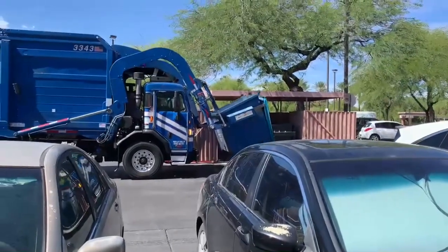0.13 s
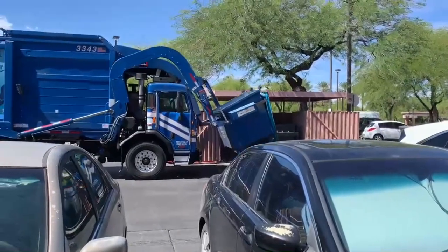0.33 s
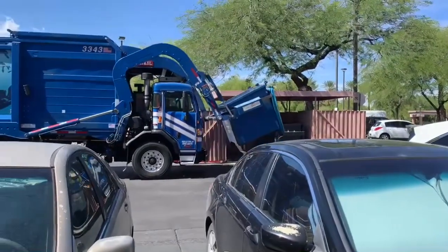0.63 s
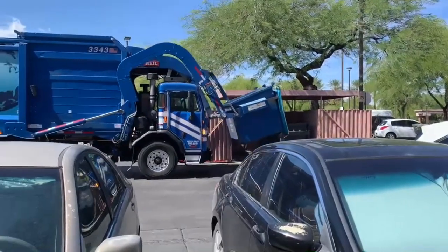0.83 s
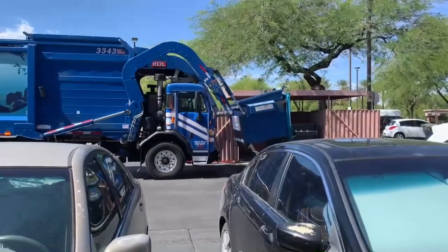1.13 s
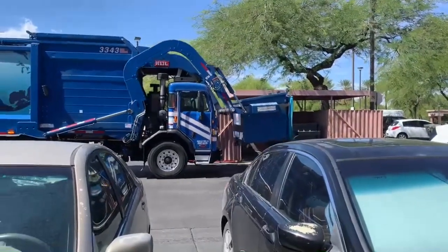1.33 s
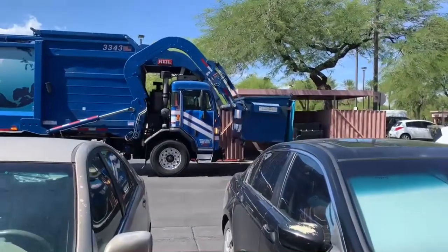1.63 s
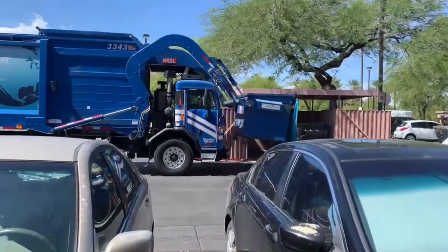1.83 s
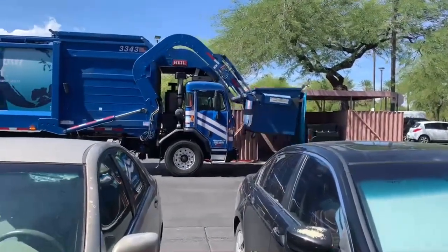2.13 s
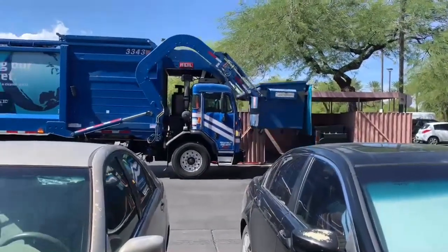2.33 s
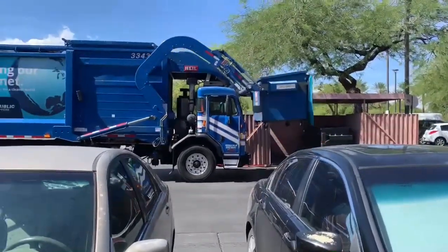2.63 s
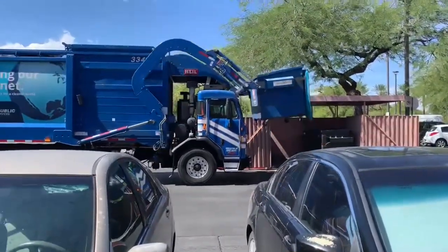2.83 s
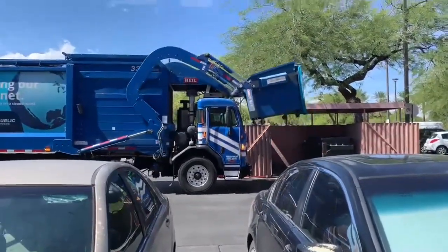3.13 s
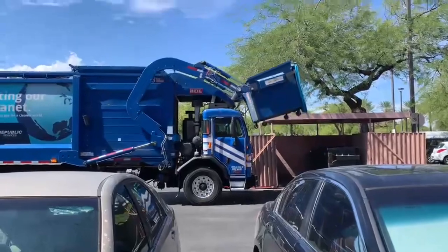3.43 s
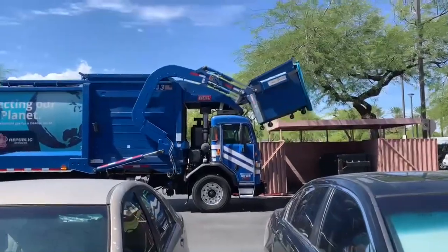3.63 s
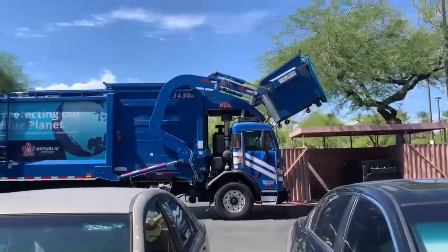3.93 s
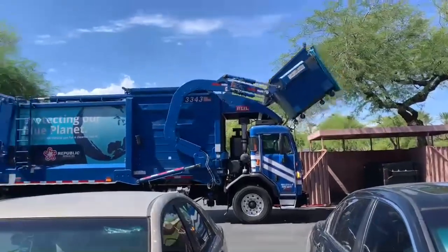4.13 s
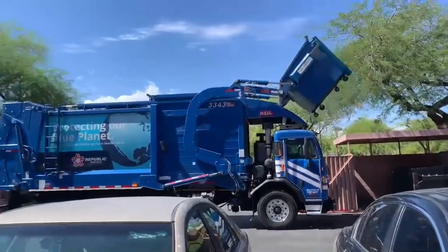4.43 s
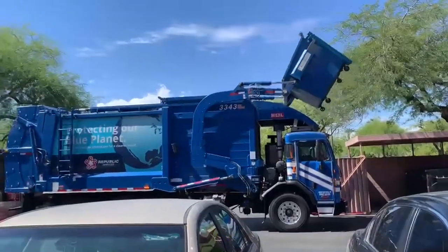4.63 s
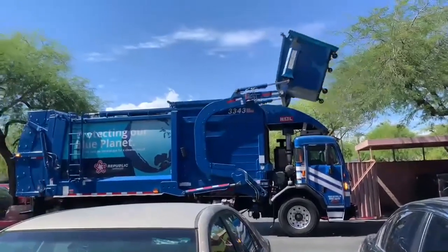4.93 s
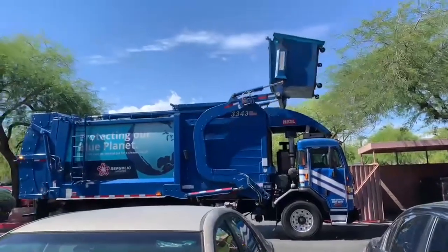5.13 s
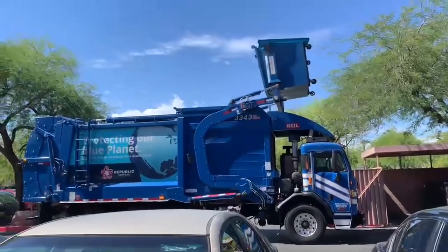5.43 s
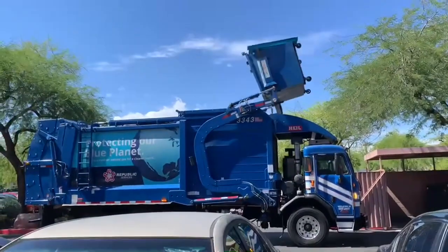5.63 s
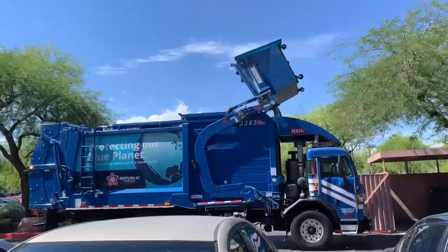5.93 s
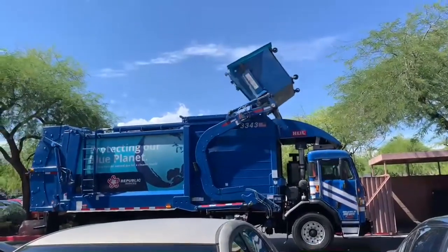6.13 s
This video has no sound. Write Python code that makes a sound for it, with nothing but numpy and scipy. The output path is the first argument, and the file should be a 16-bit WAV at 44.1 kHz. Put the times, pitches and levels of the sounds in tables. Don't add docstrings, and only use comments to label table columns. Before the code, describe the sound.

Outdoors in a car park, a heavy refuse truck engine roars some distance from a handheld phone. Breathy exhaust, rattling panels and rushing air surround a wavering fan drone and thin pump whine. Effort peaks midway, sags, then climbs again. Steel ticks and low shudders appear now and then, with light wind rumble, until the container lid bangs open at the very end.

```python
import sys
import numpy as np
from scipy import signal
from scipy.io import wavfile
from scipy.ndimage import uniform_filter1d

SR = 44100
rng = np.random.default_rng(int(sys.argv[2]) if len(sys.argv) > 2 else 0)


def generate_wav(sig):
    pcm = np.round(np.clip(np.atleast_2d(sig).T, -1, 1) * 32767).astype(np.int16)
    wavfile.write(sys.argv[1], SR, pcm)


def gain_from_db(level_db):
    decades = np.asarray(level_db, float) / 20
    return 10 ** decades


N = 277124
T = np.arange(N) / SR
HZ = np.fft.rfftfreq(2048, 1 / SR)
FRAMES = np.arange(N // 512 + 5) * 512 / SR


def evened(x):
    return x / np.sqrt(np.mean(x ** 2) + 1e-20)


def columns(rows, at):
    first, *rest = np.transpose(rows)
    return [np.interp(at, first, c) for c in rest]


def colour(points):
    hz, db = np.transpose(points)
    gain = gain_from_db(np.interp(np.log(HZ + 1), np.log(hz + 1), db, left=-90, right=-90))
    return evened(gain)[:, None]


def drift(rate_hz, at):
    rates = np.geomspace(.1, 1, num=24) * rate_hz
    return evened(sum(np.sin(2 * np.pi * (f * at + rng.random())) / np.sqrt(f) for f in rates))


def resonate(x, hz, width):
    turn = np.exp(2j * np.pi * np.cumsum(hz * np.ones(x.shape[-1])) / SR)
    r = np.exp(-np.pi * width / SR)
    return 2 * (turn * signal.lfilter([1 - r], [1, -r], x / turn)).real


def band(x, low_hz, high_hz):
    return signal.sosfilt(signal.butter(2, [low_hz, high_hz], "band", fs=SR, output="sos"), x)


def swells(start, length, db, rise_s, fall_s, rest_db, at):
    before = np.maximum(start - at[:, None], 0) / rise_s
    after = np.maximum(at[:, None] - start - length, 0) / fall_s
    power = gain_from_db(2 * db) * np.exp(-2 * (before ** 2 + after ** 2))
    return np.interp(T, at, 10 * np.log10(gain_from_db(2 * rest_db) + power.sum(axis=1)))


# pitch_hz, likeness_0_to_1, phase_lead_turns, left_minus_right_db
PORTS = [(30, 0.7, 0.16, -4), (70, 0.96, -0.041, -4), (150, 0.88, -0.011, 0), (317, 0.83, 0.046, -1.3),
         (613, 0.6, -0.034, 2), (1000, 0.64, -0.088, 0), (1800, 0.6, 0.016, 2), (2570, 0.4, -0.024, -.5),
         (4220, 0.6, -0.0035, -2), (5620, 1, 0.33, -2.5), (5870, 0.3, 0.46, -6.5), (6360, 0.9, -0.01, 2.5),
         (7000, 0.74, -0.21, -2), (8100, 0.95, -0.448, 2), (10750, 1, -0.89, -1), (13400, 0.92, -1.53, 0),
         (15700, .95, -1.87, 2)]
# time_s, left_port_lag_samples
PHONE_TURN = [(0, -4.8), (1.4, -3.7), (3.0, -2.5), (3.7, -.8), (4.3, 1.1), (5.0, 2.2), (5.8, 2.2),
              (6.28, 1.3)]


def port_noise(gain):
    a, b, c, d = rng.standard_normal((len(FRAMES), len(HZ), 4)).T
    same, turns, pan_db = (v[:, None] for v in columns(PORTS, HZ))
    delayed_hz = (HZ * np.exp(-(HZ / 4700) ** 8))[:, None]
    turns = turns - delayed_hz * columns(PHONE_TURN, FRAMES)[0] / SR
    same = np.clip(same, 0, 1)
    left = a + 1j * b
    right = same * left * np.exp(-2j * np.pi * turns) + np.sqrt(1 - same ** 2) * (c + 1j * d)
    z = np.array([left * gain_from_db(pan_db / 2), right * gain_from_db(-pan_db / 2)]) * gain
    return signal.istft(z, nperseg=2048, noverlap=1536)[1][:, :N] / 38.46


# pitch_hz, level_db
RUMBLE = [(20, -45), (38, -18), (48, 3), (62, 2), (85, 11.5), (100, 16), (120, 1), (142, -29), (165, 0),
          (210, -32)]
# start_s, length_s, level_db
GUSTS = [(0.293, 0.077, -28.5), (0.733, 0.066, -20.5), (.88, 0.11, -24), (1.49, .08, -26),
         (2.206, 0.08, -26), (3.047, 0.052, -29), (2.873, 0.044, -29), (3.65, .08, -37),
         (4.103, 0.086, -22), (4.45, 0.037, -22), (4.837, 0.052, -36), (5.385, .03, -32), (6.2, .1, -24)]


def wind_rumble():
    gust_db = swells(*np.transpose(GUSTS), rise_s=0.066, fall_s=0.21, rest_db=-29.5, at=FRAMES)
    level_db = np.interp(FRAMES, T, gust_db) + drift(7.7, FRAMES)
    return colour(RUMBLE) ** 2 * gain_from_db(2 * level_db)


# time_s, fan_blade_rate_hz, effort_db
ENGINE = [(0, 274, -6), (.58, 287, .5), (.9, 297, 1), (1.6, 298, 0.1), (1.8, 284, -1), (2.15, 279, 0),
          (2.28, 257, -1), (2.65, 264, -1.5), (3.0, 277, -0.5), (3.7, 297, 2.5), (4.25, 299, 4.5),
          (4.7, 295, 2.5), (4.95, 297, 2.5), (5.2, 272, -1.5), (5.4, 256, -3), (5.6, 262, -1.1),
          (5.9, 285, 2), (6.28, 305, 5)]
# pitch_hz, level_db
EXHAUST = [(71, -42), (120, -15.5), (182, -3), (237, -5), (279, -3), (334, -6.5), (529, -8), (687, -18),
           (777, -22), (850, -20.5), (1100, -60), (1870, -120)]


def exhaust():
    level_db = -25 + 0.36 * columns(ENGINE, FRAMES)[1] + 7.5
    return colour(EXHAUST) ** 2 * gain_from_db(2 * level_db)


# pitch_hz, level_db
CLATTER_LOW = [(410, -33), (700, -24), (787, -9), (861, -3), (1010, -0.5), (1110, -3), (1195, 0),
               (1260, -5.5), (1380, -1.5), (1490, -13), (1740, -7), (2130, -10), (2350, -9.5), (2600, -7),
               (2900, -12), (3410, -16.5), (3930, -11.5), (4790, -20.5), (5290, -21), (6000, -22),
               (7800, -55), (13200, -120)]
# pitch_hz, level_db
CLATTER_HIGH = [(410, -5), (700, -0.5), (830, -17.5), (917, -3), (1050, -4), (1180, -4.5), (1390, -4.5),
                (1560, -8), (1820, -6.5), (2310, -11.5), (3290, -11.5), (3860, -18.5), (4300, -15.5),
                (5390, -24), (6000, -20.5), (7800, -46), (13200, -120)]
# time_s, raised_colour_share_0_to_1
RAISED = [(0, 0), (2.8, 0.08), (3.8, 0.43), (6.28, 0.96)]


def clatter():
    raised = np.clip(columns(RAISED, FRAMES)[0], 0, 1)
    mixed = (1 - raised) * colour(CLATTER_LOW) ** 2 + raised * colour(CLATTER_HIGH) ** 2
    level_db = -28 + 0.44 * columns(ENGINE, FRAMES)[1] + 4.5
    return mixed * gain_from_db(2 * (level_db + 0.046 * drift(11.0, FRAMES)))


# pitch_hz, level_db
RUSH = [(4500, -35), (5600, -14), (6500, 2.5), (8300, 1), (9600, 1), (11000, -4), (13000, -5), (14500, -10),
        (15700, -7), (16000, -50)]


def air_rush():
    level_db = -48 + 0.44 * columns(ENGINE, FRAMES)[1] + 10.5
    return colour(RUSH) ** 2 * gain_from_db(2 * (level_db + 0.68 * drift(20.0, FRAMES)))


CYCLE = 25


def smooth_chance(bins, frames):
    chance = rng.standard_normal((len(FRAMES), len(HZ))).T
    return evened(uniform_filter1d(uniform_filter1d(chance, size=bins, axis=0), size=frames, axis=1))


def roar():
    patches = smooth_chance(12, 7) + 1.2 * smooth_chance(3, 22)
    low = wind_rumble() + exhaust()
    thin_top = np.exp(-(np.log(HZ[:, None] / 5400 + 1e-9) / 0.1) ** 2)
    flutter_db = 0.28 * columns(ENGINE, FRAMES)[1] + 1.0 * drift(16.0, FRAMES)
    high = (clatter() + air_rush()) * gain_from_db(2 * thin_top * flutter_db) + oil_hiss()
    firings = np.cumsum(columns(ENGINE, T)[0]) * 6 / CYCLE / SR
    puffs = 1 + 0.017 * np.cos(2 * np.pi * firings)
    low_noise = port_noise(np.sqrt(low) * gain_from_db(0.77 * patches))
    return low_noise + puffs * port_noise(np.sqrt(high) * gain_from_db(1.24 * patches))


def port_air(share):
    air = rng.standard_normal((2, N))
    return air[:1] + share * air


def narrow_noise(share, hz, width):
    return evened(resonate(resonate(port_air(share), hz, width), hz, width))


# multiple_of_cycle_rate, level_db
ORDERS = [(24, -16.), (25, 1.5), (26, -12.), (12, -14.), (18, -11.), (28, -12.), (50, -17.), (100, -19.)]
# start_s, length_s, drone_level_db, whine_level_db
SURGES = [(0.183, 0.2, -22.5, -47), (.4, 0.17, -22, -49), (0.69, 0.1, -21.5, -38), (0.792, 0.092, -29, -38),
          (1.03, 0.15, -21, -44), (1.17, 0.067, -33, -40), (1.29, 0.23, -25, -39), (1.51, 0.098, -18, -41),
          (1.72, .03, -23, -36), (1.826, 0.21, -19.5, -30.5), (2.17, .05, -33, -48),
          (2.335, 0.18, -30, -52), (2.604, 0.13, -28.5, -53), (2.807, 0.22, -24, -49),
          (3.05, 0.22, -20, -40), (3.36, 0.07, -22.5, -44), (3.47, .04, -26, -46), (3.564, 0.027, -17, -29),
          (3.657, 0.016, -16.5, -38), (3.765, .02, -25, -44), (3.907, 0.02, -15.5, -36),
          (3.99, .02, -17, -44), (4.1, 0.07, -22, -50), (4.224, 0.016, -20, -55), (4.324, 0.024, -23, -55),
          (4.43, 0.03, -23.5, -55), (4.51, .02, -21, -55), (4.6, .03, -18, -50), (4.68, .06, -21.5, -47),
          (4.802, 0.064, -20.5, -32), (4.96, .03, -21.5, -32), (5.05, 0.051, -22, -56),
          (5.16, .02, -31, -55), (5.278, 0.072, -39, -55), (5.567, 0.25, -27.5, -50),
          (5.872, 0.054, -21, -27), (6.01, .05, -22.5, -50)]


def surge_db(column, rest_db):
    start, length, *levels = np.transpose(SURGES)
    return swells(start, length, levels[column], 0.026, 0.053, rest_db, FRAMES)


def fan_drone(hz, cycles):
    drone = gain_from_db(-11) * narrow_noise(.35, hz, 30)
    for order, db in ORDERS:
        wander_db = np.interp(T, FRAMES, drift(14., FRAMES))
        sway = np.interp(T, FRAMES, drift(14., FRAMES))
        drone = drone + gain_from_db(db + 1.3 * wander_db) * np.sin(2 * np.pi * (order * cycles + .05 * sway))
    return gain_from_db(surge_db(0, rest_db=-30.5)) * drone


def pump_whine(hz):
    return gain_from_db(-6.5 + surge_db(1, rest_db=-48)) * narrow_noise(.8, 6.07 * hz, 26)


# start_s, length_s, hum_level_db
LABOURS = [
    (3.45, .14, -32),
    (3.678, .1, -32),
    (3.96, .12, -23.5),
    (4.18, 0.32, -22),
    (4.7, 0.074, -30),
    (4.897, .08, -46),
    (6.0, .3, -32.5),
]


def firing_hum(cycles):
    hum_db = swells(*np.transpose(LABOURS), rise_s=0.13, fall_s=0.2, rest_db=-37.5, at=FRAMES)
    return gain_from_db(hum_db) * np.sqrt(2) * np.sin(2 * np.pi * 6 * cycles)


# start_s, length_s, level_db
JOLTS = [(0, 0.24, -32), (0.707, .01, -21), (0.882, 0.026, -21), (0.996, 0.066, -21), (1.138, 0.044, -24),
         (1.36, .03, -27), (1.52, .15, -30), (1.958, .01, -33), (2.11, 0.46, -28), (2.7, 0.39, -35),
         (3.3, .08, -37), (4.008, 0.027, -22), (4.21, .01, -31), (4.8, 0.22, -36), (5.4, .09, -39),
         (5.9, .01, -28), (6.15, .03, -32), (6.26, 0.026, -19)]


def box_shudder():
    shudder_db = swells(*np.transpose(JOLTS), rise_s=0.046, fall_s=0.026, rest_db=-39, at=FRAMES)
    return gain_from_db(shudder_db) * narrow_noise(.2, 52.1, 8)


def tones():
    hz = columns(ENGINE, T)[0] + 0.53 * drift(6., T)
    port_lag = np.array([[0], [1]]) * hz * columns(PHONE_TURN, T)[0] / SR
    cycles = (np.cumsum(hz) / SR + port_lag) / CYCLE
    low = fan_drone(hz, cycles) + firing_hum(cycles) + box_shudder()
    return gain_from_db(np.array([[-.9], [.9]])) * low + pump_whine(hz)


# start_s, peak_db, low_edge_hz, high_edge_hz, t60_s
KNOCKS = [(0.62, -24, 4100, 11000, 0.28), (0.61, -24, 5050, 5750, 0.15), (.705, -28, 1700, 5100, 0.31),
          (3.647, -21, 1200, 1450, .15), (3.1, -22, 1080, 1400, .9), (0.022, -19.5, 147, 180, 2.3),
          (0.29, -20, 145, 186, 1.5), (.69, -22.5, 1500, 4700, 0.38), (.7194, -27, 1000, 6400, 0.19),
          (1.4014, -38, 1800, 6000, .15), (2.1074, -18, 2410, 2600, 0.15), (2.316, -23.5, 4100, 5400, 0.22),
          (2.371, -25.5, 9300, 12000, 0.084), (2.374, -26, 3800, 8000, 0.2),
          (2.382, -30, 9400, 12600, 0.085), (2.3728, -32, 12600, 15000, .05), (2.385, -29, 4800, 5400, .3),
          (2.9, -31, 1800, 6000, .05), (1.8, -31, 4500, 6460, 0.6), (.63, -27, 3900, 7500, 0.34),
          (0.7, -31, 1000, 4500, .5), (.74, -34, 1800, 6500, 0.22), (1.31, -33, 3900, 6500, 0.27),
          (3.22, -26, 3200, 9600, .3), (3.6, -27, 2900, 7000, 0.36), (4.4, -12, 380, 680, 0.7),
          (.34, -28, 430, 590, 0.21), (4.7596, -27, 2000, 9000, .15), (5.8296, -29, 1700, 6000, .15),
          (6.102, -21.5, 2300, 7400, 0.17), (6.122, -27, 5900, 6700, 0.21), (6.14, -26, 5000, 5600, .3),
          (6.159, -25, 4000, 4350, .12), (6.176, -22, 2600, 2900, 0.17), (6.196, -26, 5000, 5500, 0.25),
          (6.204, -12.5, 720, 930, 0.18), (6.215, -32, 4700, 5600, .2), (6.262, -24, 2600, 3250, .2),
          (6.11, -17, 870, 1100, 0.13)]


def knocks(white):
    out = np.zeros((2, N))
    for start_s, db, low_hz, high_hz, t60 in KNOCKS:
        at = round(start_s * SR)
        t = T[:min(SR // 3, N - at)]
        rattle = evened(band(white[:, at:at + len(t)], low_hz, high_hz))
        rise = np.minimum(t / (.015 * t60), 1)
        fade = np.cos(t / T[SR // 3] * np.pi / 2)
        out[:, at:at + len(t)] += gain_from_db(db - 8.5 - 60 * t / t60) * rise * fade * rattle
    return out


# pitch_hz, level_db
OIL = [(3300, -30), (3800, -10), (4300, 0), (4800, 0), (5200, -25)]
# start_s, length_s, hiss_level_db
LIFT = [
    (3.2, .8, -40),
    (4.3, .25, -46),
]


def oil_hiss():
    hiss_db = swells(*np.transpose(LIFT), rise_s=0.27, fall_s=.25, rest_db=-70, at=FRAMES)
    return colour(OIL) ** 2 * gain_from_db(2 * np.interp(FRAMES, T, hiss_db))


# start_s, peak_db, brightness_db
BANGS = [(6.102, -14, 0.5), (6.108, -2.5, -9), (6.115, -5.5, -22), (6.128, -23, -5), (6.137, -23, -8),
         (6.146, -10, -18), (6.161, -10, -10), (6.179, -10.5, -9), (6.186, -10.5, -18), (6.196, -14, -13),
         (6.208, -27, -5), (6.222, -18, -11), (6.231, -16, -18), (6.245, -21, -5), (6.261, -6, -16),
         (6.27, -13, -12)]


def blows(t, bright, t60, rise_s):
    strokes = np.zeros(len(t))
    for start_s, db, bright_db in BANGS:
        since = np.maximum(t - start_s, 0)
        strokes += gain_from_db(db + bright * bright_db - 60 * since / t60) * np.minimum(since / rise_s, 1)
    return strokes


# pitch_hz, width_hz, level_db
BOX = [(57, 23, -2.5), (181, 54, -4.5), (235, 36, 3), (308, 28, 3.5), (346, 26, 4), (392.6, 9.4, 0),
       (498, 98, -1), (580, 21, -5), (680, 40, -11), (820, 66, -12)]


def box_boom(white, t):
    shake = blows(t, 0, t60=0.16, rise_s=0.0024)
    boom = gain_from_db(-2.0) * shake * evened(band(white, 120., 800.))
    for hz, width, db in BOX:
        boom = boom + gain_from_db(db) * resonate(evened(resonate(white, hz, width)) * shake, hz, 4.6 * width)
    for start_s, blow_db, _ in BANGS:
        since = np.maximum(t - start_s, 0)
        for hz, _, db in BOX[1:]:
            boom = boom + gain_from_db(blow_db + db - 60 * since / 0.14) * np.sin(2 * np.pi * hz * since)
    return boom


# pitch_hz, width_hz, level_db
LID = [(990, 32, 4), (1380, 41, -3), (1670, 41, 4.5), (1970, 74, 10), (2710, 120, 4), (3220, 60, -6),
       (4080, 70, -1), (5120, 81, 0), (6350, 60, -9), (6520, 90, -15)]


def lid_clang(white, t):
    clang = 0
    for hz, width, db in LID:
        bent_hz = hz * (1 + .035 * drift(30., t))
        clang = clang + gain_from_db(db) * evened(resonate(white, bent_hz, 1.1 * width))
    return blows(t, 1, t60=.07, rise_s=0.0023) * clang


def lid_crash(white, t):
    return blows(t, 1, t60=.3, rise_s=0.0045) * evened(band(white, 800., 10500.))


def lid(white):
    start = round(BANGS[0][0] * SR) - 2000
    white, t = white[:, start:], T[start:]
    out = np.zeros((2, N))
    out[:, start:] = gain_from_db(np.array([[-16.3], [-14.9]])) * box_boom(white, t)
    out[:, start:] += gain_from_db(-20.0) * lid_clang(white, t) + gain_from_db(-20.5) * lid_crash(white, t)
    return out


def scene():
    white = port_noise(1)
    return roar() + tones() + knocks(white) + lid(white)


def low_pass(x):
    return signal.sosfilt(signal.butter(12, 15750, fs=SR, output="sos"), x)


def record(dry):
    cut = signal.sosfilt(signal.butter(3, 40., "high", fs=SR, output="sos"), dry)
    limited = cut / (1 + (cut / .92) ** 6) ** (1 / 6)
    return low_pass(limited)


dry = scene()
out = record(dry)
generate_wav(out)
```